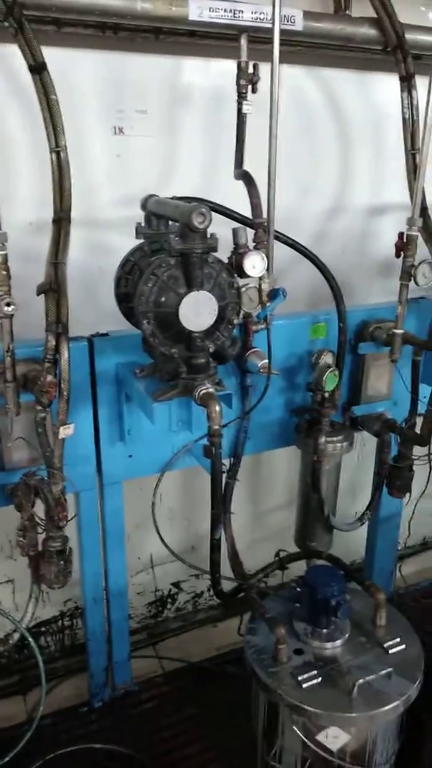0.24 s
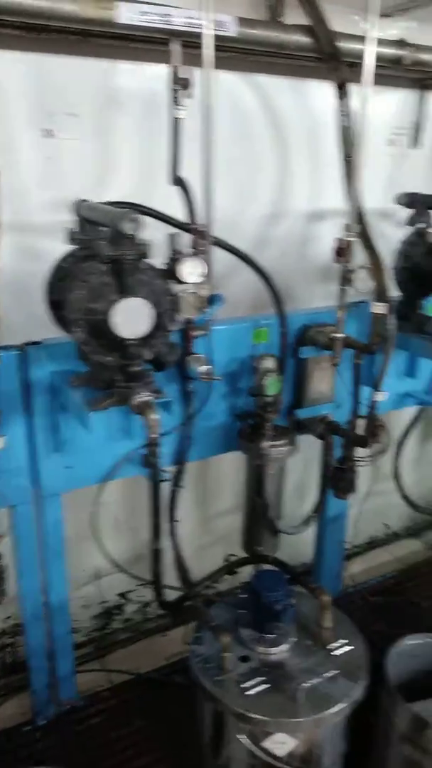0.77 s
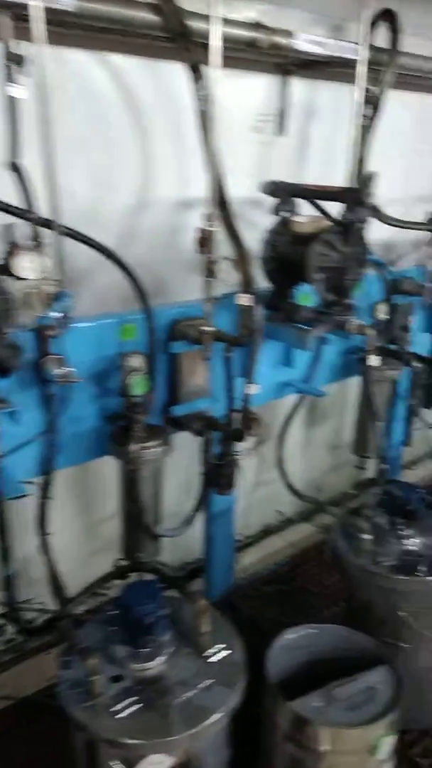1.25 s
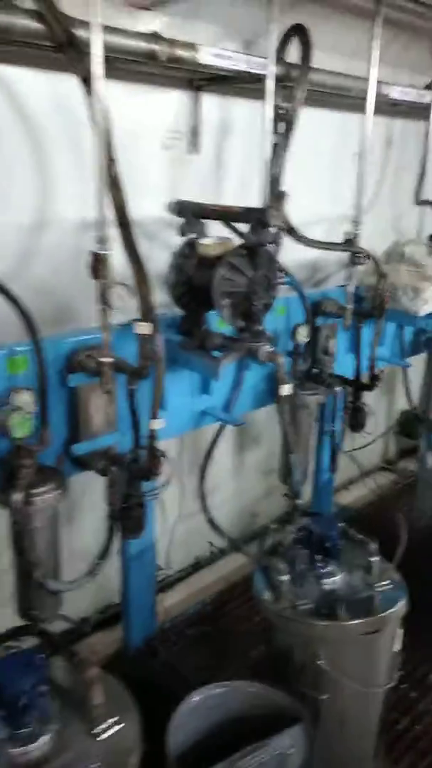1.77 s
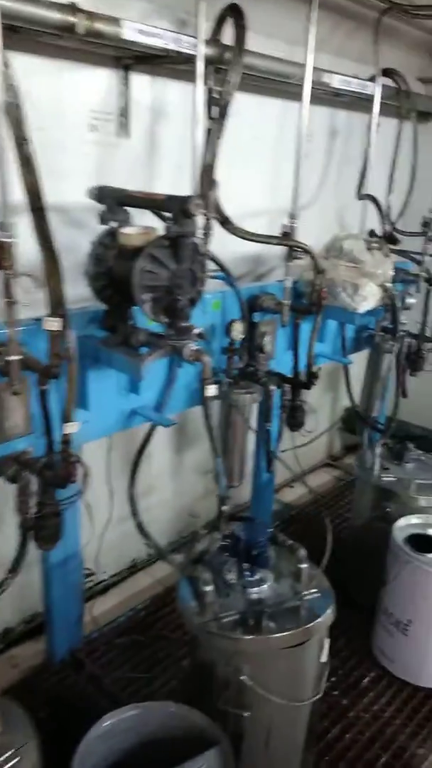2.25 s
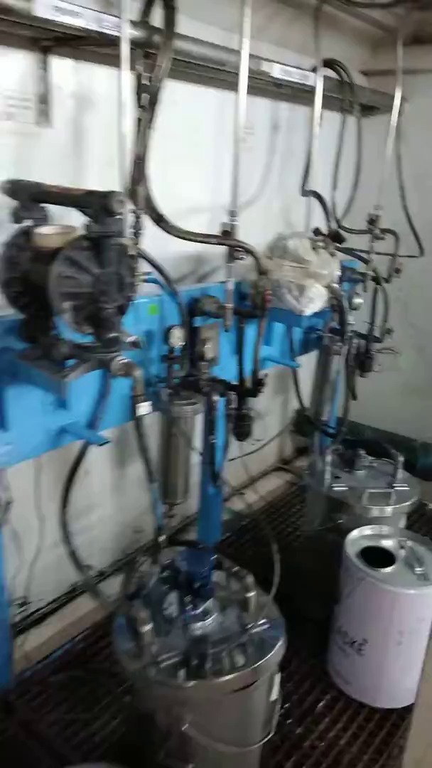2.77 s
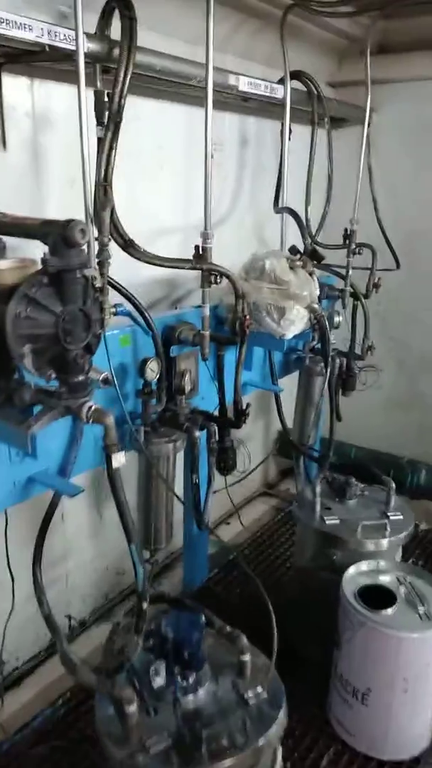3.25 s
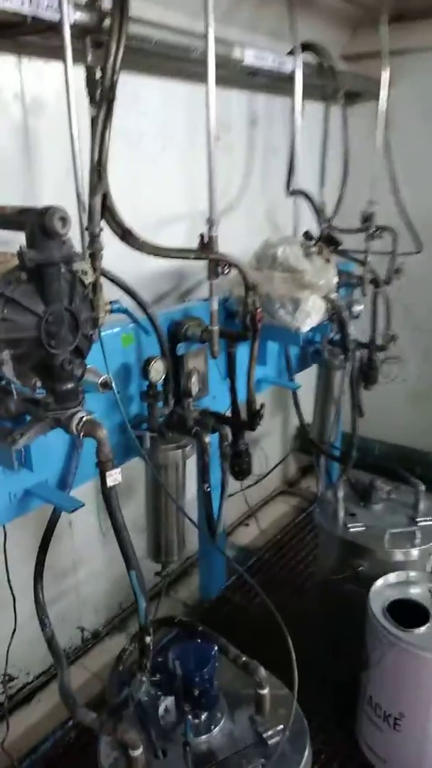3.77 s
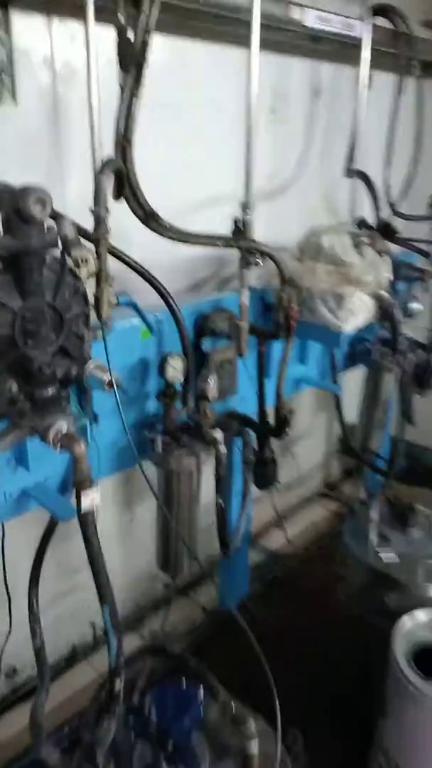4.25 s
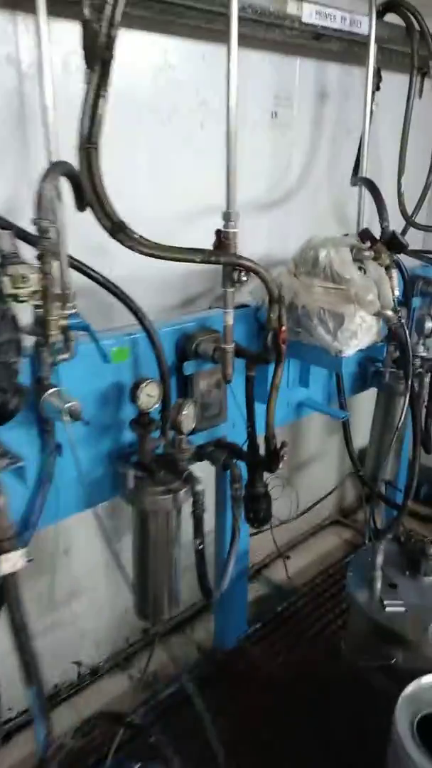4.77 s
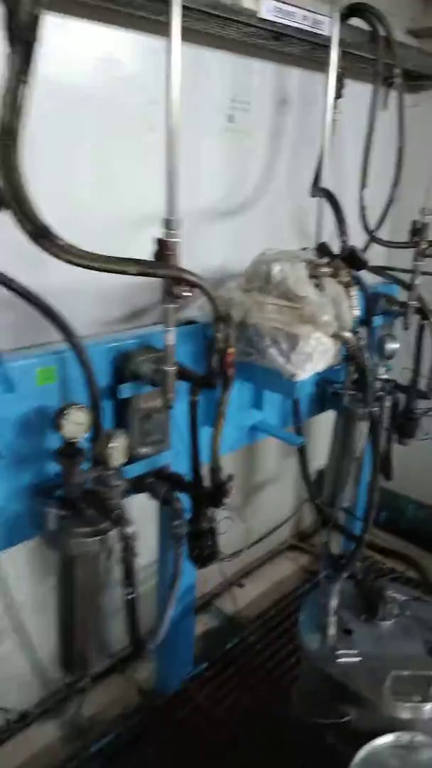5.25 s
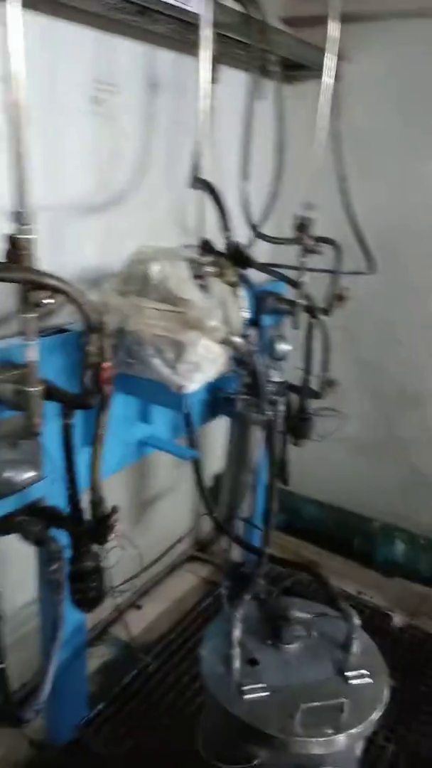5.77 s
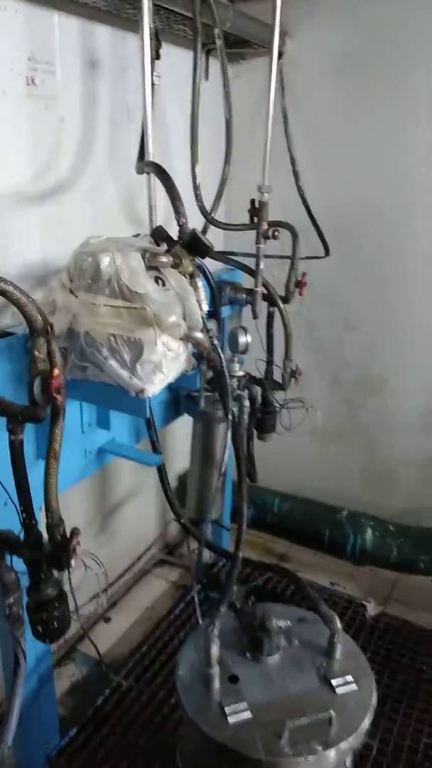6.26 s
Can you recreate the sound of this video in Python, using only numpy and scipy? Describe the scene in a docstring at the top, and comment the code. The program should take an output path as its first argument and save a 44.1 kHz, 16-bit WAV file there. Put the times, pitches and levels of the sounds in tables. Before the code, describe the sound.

In a hard-walled industrial room, air-driven pumps are already running at 0 s, out of step. Exhaust blasts follow every 0.1 to 0.4 seconds, each opening abruptly into a broad hiss with throaty roar, fine fizz and a low, cushioned thud. A long fizzy release begins near 0.3 s; a strong, hollow muffled blast comes at 0.84 s and short sharp ones around 1.4 and 2.5 s. The background rush and rumble thin between about 2.7 and 3.1 s, where strokes are sparser, then a ringing puff hits at 3.2 s. The rush swells again toward 4.5 s, when valve balls chatter in four quick knocks. Another resonant blast sounds at 4.95 s, the background dips near 5.25 s, and thumping puffs resume around 5.7 s. From 5.85 s a faint hollow drone swells under the last exhaust at 6.07 s and its fading reverberant tail. The wide stereo microphone moves throughout, shifting the colour.

```python
"""A hard-walled paint room, where several air-driven diaphragm pumps work out of step on a steel rail.
At each stroke a valve flips and spent air blows off through a muffler: noise shaped by jet and resonance.
The diaphragms thud in their housings, as noise, knocks and decaying sines at low resonances.
Far pumps and reverberation make a rush of noise that rises and falls; valve balls knock, a late drone swells.
A widened stereo pair moves along the row, its left and right partly coherent."""
import sys
import numpy as np
from scipy import signal
from scipy.fft import rfft, irfft, next_fast_len
from scipy.io import wavfile
from scipy.ndimage import map_coordinates

SR = 44100
rng = np.random.default_rng(int(sys.argv[2]) if len(sys.argv) > 2 else 0)


def dump_mix(stems):
    """Bounce the given channels to the path in sys.argv[1] as a 16-bit WAV at rate SR."""
    frames = np.atleast_2d(stems).T  # one column per channel
    limited = np.clip(frames, -1, 1)  # hard clip at full scale
    pcm = np.round(limited * 32767).astype(np.int16)
    wavfile.write(sys.argv[1], SR, pcm)


N = 287532
TIME = np.arange(N) / SR  # s
SIZE = next_fast_len(N + 8192)  # transform length with room for tails
HZ = np.fft.rfftfreq(SIZE, 1 / SR)

# pump strokes, levels before each function's own offsets: (t/s, hiss level/dB, blowing time/s,
# share ringing in the muffler 0-1, thud level/dB, extra fizz level/dB, valve opening time/s, roar level/dB)
PUMP_STROKES = [(.033, -29.5, 0.098, 0.7, -32, -1, 0.0086, -33.5),
                (.268, -33.5, 0.42, 0.5, -27.5, 4.5, 0.011, -33),
                (.476, -27.5, .19, 0.53, -30, 2.5, 0.0069, -29.5),
                (.629, -28.5, 0.096, 0.64, -42, 2, .0064, -35),
                (.839, -24.5, 0.11, 0.84, -34, 3, 0.0096, -31),
                (1.194, -29, 0.1, 0.5, -33.5, 2, 0.0073, -30.5), (1.315, -33, .18, 0.5, -31, 0, .01, -30.5),
                (1.4, -25, .044, 0.4, -48, 2, .0074, -35), (1.555, -33, 0.15, 0.1, -34, -4, .0071, -31),
                (1.7, -31.5, 0.17, 0, -31, -1.5, 0.0067, -29.5),
                (1.887, -29.5, 0.1, 0, -28.5, 0.5, 0.0076, -30.5),
                (2.183, -28.5, 0.091, .05, -34.5, 0.5, .0054, -34),
                (2.355, -32, 0.13, .6, -28, 2.5, 0.016, -31), (2.49, -24, 0.018, 0.64, -38, 2, .0085, -33),
                (2.58, -35, 0.12, 0.15, -55, -2, 0.012, -36.5),
                (2.962, -31, 0.078, 0.58, -36, 5, 0.0027, -36),
                (3.181, -24, 0.055, 1, -41, 2, 0.0072, -28.5),
                (3.326, -32.5, 0.18, 0.22, -32.5, -2.5, 0.0065, -32.5),
                (3.591, -32.5, 0.083, 0.2, -34, -2, 0.011, -35.5),
                (3.745, -29, 0.082, 0, -40, -1, .004, -32), (4.015, -32, 0.18, 0.32, -42, 4, 0.0086, -32),
                (4.12, -29, .1, 0.3, -28, -13, 0.013, -32.5),
                (4.445, -28.5, 0.092, 0.48, -29, 4.5, 0.018, -29.5),
                (4.511, -31, 0.24, 0.3, -40, 0, .0059, -40),
                (4.719, -28.5, 0.063, .07, -31.5, 0, 0.015, -33),
                (4.952, -26, 0.084, 0.91, -34, 2, 0.0038, -36),
                (5.297, -31, 0.13, 0.35, -35, 2.5, .0059, -35.5),
                (5.431, -30, 0.15, .24, -32.5, -1, .011, -36), (5.659, -31.5, .1, 0, -40, -5, .0039, -32.5),
                (5.763, -29.5, 0.064, 0.07, -27.5, -.5, 0.0081, -33),
                (6.065, -30.3, 0.16, 0, -36, 2, .0064, -39)]
# relative spectrum of the throaty roar: (f/Hz, level/dB)
ROAR_SPECTRUM = [(30, -40), (150, 0), (245, -0.5), (320, 1.5), (600, 1), (950, 0.3), (1350, 0), (1750, -2),
                 (2200, -2.5), (3000, -10), (6000, -22), (14000, -35)]
# hollow colour common to the hiss of all the pumps, at depth 1: (f/Hz, width/Hz, level/dB)
PORT_PEAKS = [(1300, 130, 8), (2280, 110, 5.5), (2620, 100, 4.5), (2880, 85, -4), (3380, 77, -3),
              (3970, 300, 4.5), (4700, 220, -0.5), (5060, 120, 3.5), (6170, 250, 6), (6770, 130, -1),
              (11060, 290, 9.5)]


def amp(db):
    """Level definition: decibels to amplitude gain."""
    return 10 ** (np.asarray(db) / 20)


def unit(x):
    """Normalisation to a root-mean-square of 1."""
    return x / np.sqrt(np.mean(x ** 2) + 1e-20)


def along(points):
    """Interpolation of (f/Hz, value) points on a logarithmic frequency axis."""
    f, value = np.transpose(points)
    return np.interp(np.log(HZ + 1), np.log(f + 1), value)


def wobble(rate):
    """Slow random modulation: a smooth curve through rate random knots a second."""
    knots = rng.standard_normal(int(N * rate / SR) + 4)
    return map_coordinates(knots, [TIME * rate])


def white():
    """White noise has equal mean power at all frequencies; this is a fresh spectrum of it."""
    return rfft(rng.standard_normal(SIZE))


def ripple(peaks, depth):
    """Resonance gain: Gaussian peaks and gaps in dB, all scaled by depth."""
    return amp(depth * sum(db * np.exp(-.5 * ((HZ - hz) / width) ** 2) for hz, width, db in peaks))


def air(colour):
    """Stereo coherence: coloured noise of rms 1 as left-first and right-first waves plus a diffuse part."""
    # coherence of left and right: (f/Hz, likeness 0-1)
    likeness = [(50, .8), (170, .64), (400, .56), (700, .8), (1050, .97), (2100, .996), (3200, .98),
                (4400, .95), (6600, .85), (7500, .6), (9000, .36), (14000, .25)]
    # share of the wave power that leads in phase on the left: (f/Hz, share 0-1)
    left_share = [(1550, .5), (2650, .58), (3700, .64), (4800, .76), (5850, .85), (7000, .73), (10000, .77)]
    # level of left over right: (f/Hz, level/dB)
    side_balance = [(70, -1.5), (170, 2.5), (400, 1), (2100, 0.1), (3200, 1), (4400, 1), (5500, 4),
                    (6700, 3), (7500, 3), (10000, 4), (13500, -0.5)]
    # phase between left and right: (f/Hz, phase/half turns)
    channel_phase = [(1020, 0), (2090, 1), (3150, 2), (4400, 3), (5350, 4), (6600, 5), (7550, 6), (8700, 7),
                     (14400, 12.5)]
    lead = np.exp(.5j * np.pi * np.interp(HZ, *np.transpose(channel_phase)))
    left_first = np.array([lead, lead.conj()])
    alike, left = along(likeness), along(left_share)
    waves = np.sqrt(left) * white() * left_first + np.sqrt(1 - left) * white() * left_first.conj()
    diffuse = np.array([white(), white()])
    pair = np.sqrt(alike) * waves + np.sqrt(1 - alike) * diffuse
    balance = amp(np.outer([.5, -.5], along(side_balance)))
    return unit(irfft(pair * colour * balance, SIZE)[:, :N])


def release(start, length, rise, droop_db, t60):
    """Chamber discharge, as power: the valve opens, pressure sags while it empties, then the flow dies."""
    t = np.maximum(TIME - start, 0)
    fall_db = droop_db * np.minimum(t / length, 1) + 60 * np.maximum(t - length, 0) / t60
    opening = 1 - np.exp(-t / rise)
    return (opening * amp(-fall_db)) ** 2


def in_room(power, wet, t60):
    """Reverberant decay: amplitude of a noise of this power plus the walls' exponentially dying answer."""
    keep = amp(-60 / (t60 * SR)) ** 2
    answer = signal.lfilter([1 - keep], [1, -keep], power)
    return np.sqrt(power + wet * answer)


def patchy(x, depth_db, width_hz, life_s, size=512):
    """Spectral modulation: the colour of a noise shifts in random patches of this width and life."""
    hz, t, z = signal.stft(x, SR, nperseg=size)
    knots = rng.standard_normal((size, size))
    places = np.meshgrid(hz / width_hz, t / life_s, indexing="ij")
    field = map_coordinates(knots, places, mode="mirror")
    return signal.istft(z * unit(amp(depth_db * field)), SR, nperseg=size)[1][:, :N]


def far_pumps_and_room(rumble_db=-5.0, roar_db=-0.55, hiss_db=-4):
    """Incoherent sum: far pumps and the room's reverberation blur into rumble, roar and hiss."""
    # common level, before the offset of each part: (t/s, level/dB)
    far_level = [(0.0, -32), (0.73, -31), (0.96, -37), (1.23, -34.5), (1.43, -35), (1.83, -32), (2.0, -33),
                 (2.38, -32.5), (2.74, -40.5), (3.01, -39), (3.32, -35), (4.45, -31.5), (4.76, -33),
                 (5.25, -38), (5.63, -31.5), (6.52, -34)]
    # relative spectrum of the rumble: (f/Hz, level/dB)
    rumble_spectrum = [(20, -32), (38, -17), (54, -0.5), (72, -1.5), (90, 2.5), (130, 0), (168, 1.5),
                       (205, -2), (250, -8), (295, -5.5), (400, -10), (900, -6), (4000, -77)]
    # relative spectrum of the far hiss: (f/Hz, level/dB)
    far_spectrum = [(100, -72), (1200, -30), (2200, -4), (3200, -3.5), (4100, 2), (6000, 3), (7500, -2),
                    (10000, -4), (12000, -7.5), (14200, -14)]
    level_db = np.interp(TIME, *np.transpose(far_level))
    # all parts rise and fall together; each also wavers a little on its own
    rumble = amp(level_db + rumble_db + 0.38 * wobble(11)) * air(amp(along(rumble_spectrum)))
    roar = amp(level_db + roar_db + 0.59 * wobble(25)) * air(amp(along(ROAR_SPECTRUM)))
    hiss_colour = amp(along(far_spectrum)) * ripple(PORT_PEAKS, depth=0.42)
    hiss = amp(level_db + hiss_db + 0.45 * wobble(14)) * air(hiss_colour)
    return rumble, roar + hiss


def leak(db=-54, corner_hz=5000):
    """Steady turbulence: air seeps from the fittings as noise weighted to the treble."""
    return amp(db) * air(HZ / np.hypot(HZ, corner_hz))


def exhausts():
    """Turbulent jet noise: each blast is a broad hiss, a part ringing in the muffler, a roar and a fine fizz."""
    # relative spectrum of the free hiss: (f/Hz, level/dB)
    hiss_spectrum = [(100, -49), (700, -2), (1500, -2.5), (2300, 5), (3300, 6), (4300, 2), (6200, -2.5),
                     (7200, -2), (9500, -13), (12000, -15), (14200, -27)]
    # relative spectrum of the muffled hiss: (f/Hz, level/dB)
    muffled_spectrum = [(100, -51), (700, -4.5), (1400, 0.5), (2300, -4), (3300, 1.5), (4300, 2),
                        (6200, -2), (7500, -11), (9500, -9.5), (12000, -5.5), (14200, -11)]
    # relative spectrum of the fizz: (f/Hz, level/dB)
    fizz_spectrum = [(2000, -45), (5000, -2), (7500, 6.5), (9500, 3.5), (11000, 7.5), (13000, 5),
                     (14200, 0)]
    # peaks and gaps of the most resonant muffler, at depth 1: (f/Hz, width/Hz, level/dB)
    muffler_peaks = [(1330, 77, 6.5), (2270, 74, 11.5), (2640, 170, 7), (3080, 91, 2), (3690, 110, 4.5),
                     (4130, 86, 6), (4680, 140, -5), (5335, 125, 7.5), (5770, 89, 3), (6250, 190, 5),
                     (6970, 130, -10), (7430, 120, 6), (8500, 180, -2), (9100, 200, 4.5), (9860, 300, -18),
                     (11360, 460, 4.5), (12950, 300, 6.5)]
    base_fizz_db, fizz_choke_db = -1, 12.5  # fizz re hiss; what a fully ringing muffler takes from it
    spit_db, spit_s = -2, 0.019  # first spit re the hiss, and its length
    plain, ringing, throaty, fine = np.zeros((4, N))  # powers
    for s, db, length, share, _, fizz_db, opening, roar_db in PUMP_STROKES:
        # full pressure as the valve flips
        spit = amp(spit_db) ** 2 * release(s, spit_s, rise=0.5 * opening, droop_db=2.5, t60=0.32)
        flow = spit + release(s, length, rise=opening, droop_db=5.0, t60=0.34)
        plain += (1 - share) * amp(db) ** 2 * flow
        ringing += share * amp(db) ** 2 * flow
        # the roar builds more slowly
        throaty += amp(roar_db) ** 2 * release(s, length, rise=1.5 * opening, droop_db=4, t60=0.33)
        fine_db = db + base_fizz_db + fizz_db - fizz_choke_db * share
        fine += amp(fine_db) ** 2 * (flow - 0.4 * spit)

    hiss_colour = amp(along(hiss_spectrum)) * ripple(PORT_PEAKS, depth=1)
    hiss = in_room(plain, wet=1.0, t60=0.64) * air(hiss_colour)
    sputter_db = 0.29 * wobble(61) + 1.14 * wobble(400)  # the jet sputters in the muffler
    ring_colour = amp(along(muffled_spectrum)) * ripple(muffler_peaks, depth=1.26)
    ring = in_room(ringing, wet=0.81, t60=0.47) * air(ring_colour) * amp(sputter_db)
    ring = patchy(ring, depth_db=2.0, width_hz=220, life_s=0.12)  # its resonances come and go
    roar = in_room(throaty, wet=0.37, t60=1.0) * air(amp(along(ROAR_SPECTRUM)))
    fizz_noise = patchy(air(amp(along(fizz_spectrum))), depth_db=3.5, width_hz=450, life_s=0.025)
    fizz = in_room(fine, wet=0.12, t60=0.22) * fizz_noise
    flutter_db = 0.76 * wobble(60) + 0.19 * wobble(260)
    return (hiss + ring + roar + fizz) * amp(flutter_db)


def diaphragms(knock_db=-4, soft_hz=500, knock_delay_s=0.00634, surge_db=-3.8, surge_s=0.04):
    """Forced resonance: each reversal knocks the housing, and the surge of paint keeps it shaking."""
    # relative resonances of pump housings and rail, before cushioning: (f/Hz, width/Hz, level/dB)
    housing_modes = [(56.5, 14, -18), (102, 28, -6.5), (164, 26, -2), (288, 40, -19)]
    body = sum(amp(db) * 1j * HZ * width / (hz ** 2 - HZ ** 2 + 1j * HZ * width)
               for hz, width, db in housing_modes)
    body = body / (1 + 1j * HZ / soft_hz)  # rubber and paint cushion the blow
    power, blows = np.zeros(N), np.zeros(SIZE)
    for s, _, _, _, db, *_ in PUMP_STROKES:
        power += amp(db) ** 2 * release(s, surge_s, rise=0.0031, droop_db=3.0, t60=0.16)
        blows[round((s + knock_delay_s) * SR)] = amp(db + knock_db)  # the knock comes as the pressure builds
    surge = amp(surge_db) * in_room(power, wet=0.39, t60=1.0) * air(abs(body))
    knock = irfft(rfft(blows) * body, SIZE)[:N] / abs(irfft(body, SIZE)).max()
    return surge + knock


def housing_ring(scatter=0.05, ring_db=0.3, grows=1.27, rise=0.019, t60=0.14):
    """Damped free vibration: each surge swells two housing modes into a short boom at scattered pitches."""
    # mean pitch and relative level of the boom: (f/Hz, level/dB)
    boom_modes = [(100, -10.5), (171, 0)]
    typical_db = -32  # thud of an average stroke; harder ones boom out of proportion
    out = np.zeros(N)
    scatters = rng.standard_normal((len(PUMP_STROKES), len(boom_modes)))
    for (s, _, _, _, db, *_), detunes in zip(PUMP_STROKES, scatters):
        t = np.maximum(TIME - s, 0)
        boom_db = typical_db + grows * (db - typical_db) + ring_db
        swell = amp(boom_db - 60 * t / t60) * (t / rise) ** 2
        for (hz, level), detune in zip(boom_modes, detunes):
            out += amp(level) * swell * np.sin(2 * np.pi * hz * (1 + scatter * detune) * t)
    return out


def check_balls(t60=0.02, gain_db=-2):
    """Impact excitation: check-valve balls chatter on their seats, each knock a set of fast-dying sines."""
    # knocks, before gain and random spread: (t/s, level/dB)
    ball_knocks = [(4.457, -25), (4.474, -22), (4.503, -27), (4.517, -22)]
    # modes of the seat, relative: (f/Hz, level/dB)
    seat_modes = [(190, -3), (410, -3), (680, 0)]
    out = np.zeros(N)
    for s, db in ball_knocks:
        t = np.maximum(TIME - s, 0)
        for hz, level in seat_modes:
            start_db = db + gain_db + level + rng.normal(0, 2.9)
            out += amp(start_db - 60 * t / t60) * np.sin(2 * np.pi * hz * t)
    return out


def drone(hz=288, width_hz=24, db=-43, start_s=5.85, swell_s=0.3):
    """Narrow-band noise: a hollow drone swells as the stereo pair nears the end of the row."""
    swell = np.clip((TIME - start_s) / swell_s, 0, 1)
    return amp(db) * swell * air(np.exp(-.5 * ((HZ - hz) / width_hz) ** 2))


def walls(x, strength, drift, count=7):
    """Comb filtering: early echoes off wall, floor and drums, with paths that drift as the pair moves."""
    out = x.copy()
    sway = drift * wobble(.7)  # s
    for delay, bearing in rng.uniform([.003, -1], [.02, 1], (count, 2)):  # delay in s, bearing -1 to 1
        when = (TIME - delay - bearing * sway) * SR
        out += strength * np.array([map_coordinates(side, [when]) for side in x])
    return out / np.sqrt(1 + count * strength ** 2)


def turning(x, sway_s=4e-6, rate=5):
    """Time-difference modulation: the pair turns slightly, so the lag between left and right wanders."""
    lag = sway_s * wobble(rate)  # each side shifts by this, in opposite senses
    return np.array([map_coordinates(side, [(TIME + sign * lag) * SR], order=5)
                     for side, sign in zip(x, (1, -1))])


def scene():
    """Superposition: near pumps over the rush of the room."""
    rumble, rush = far_pumps_and_room()
    hiss = walls(exhausts() + rush, strength=0.16, drift=0.000667)
    hiss = patchy(hiss, depth_db=2.0, width_hz=190, life_s=0.16)  # the colour keeps shifting
    return turning(hiss) + diaphragms() + housing_ring() + check_balls() + drone() + rumble + leak()


def record(dry, low_cut_hz=46, top_hz=14300):
    """Band limitation: the recorder weakens the deepest bass and drops everything above its top frequency."""
    bass = 1 / np.sqrt(1 + (low_cut_hz / (HZ + 1)) ** 6)
    return irfft(rfft(dry, SIZE) * bass * (HZ < top_hz), SIZE)[:, :N]


dry = scene()
out = record(dry)
dump_mix(out)
```